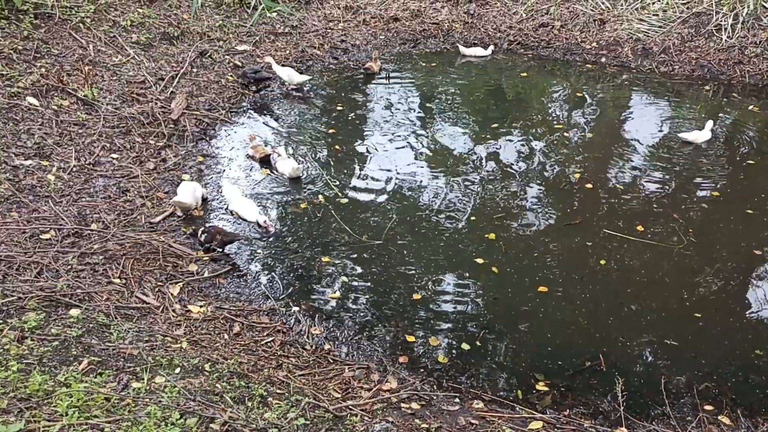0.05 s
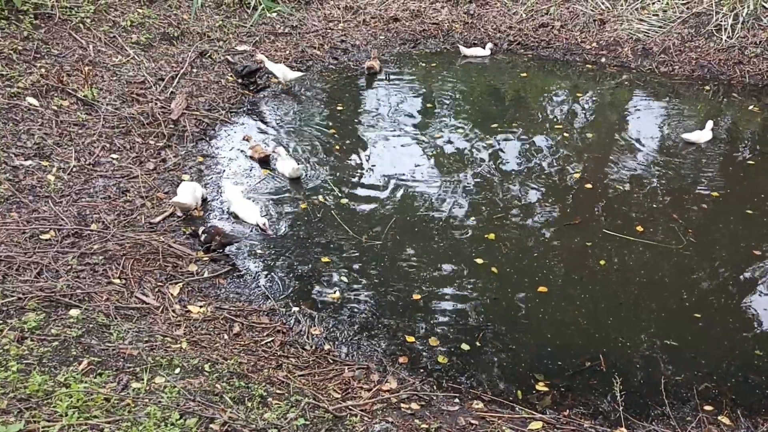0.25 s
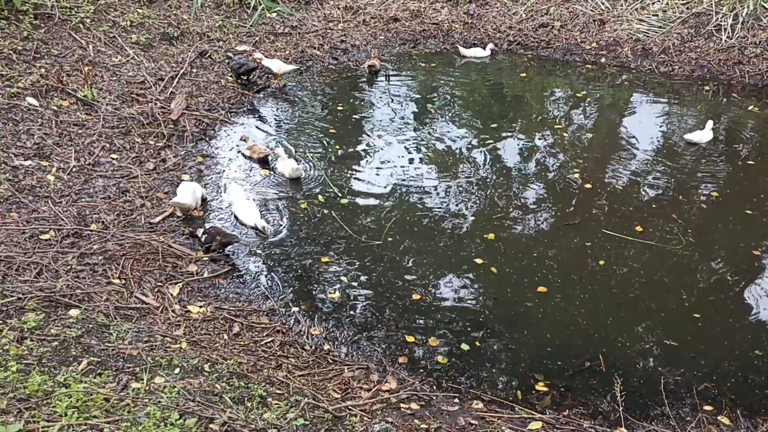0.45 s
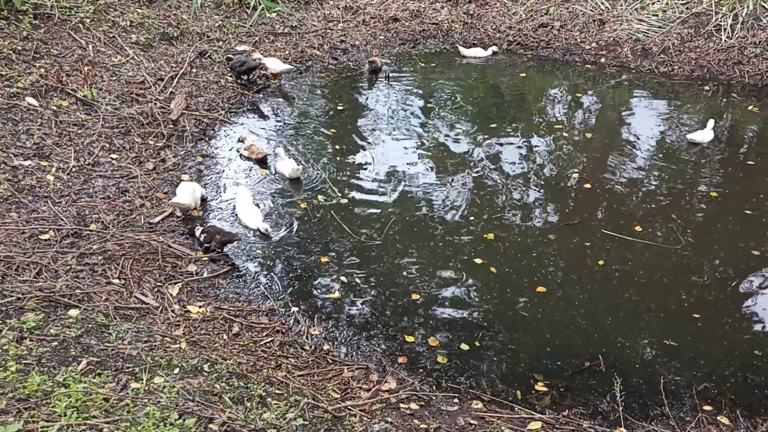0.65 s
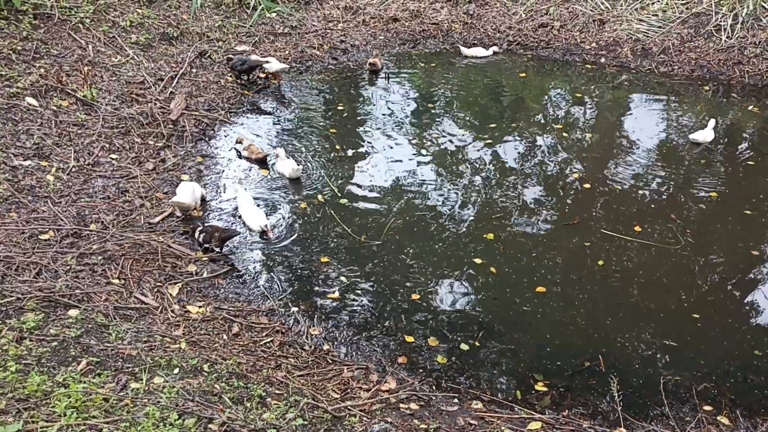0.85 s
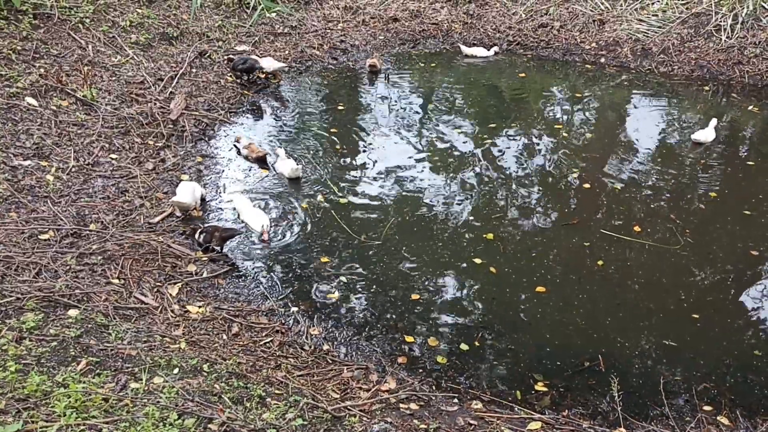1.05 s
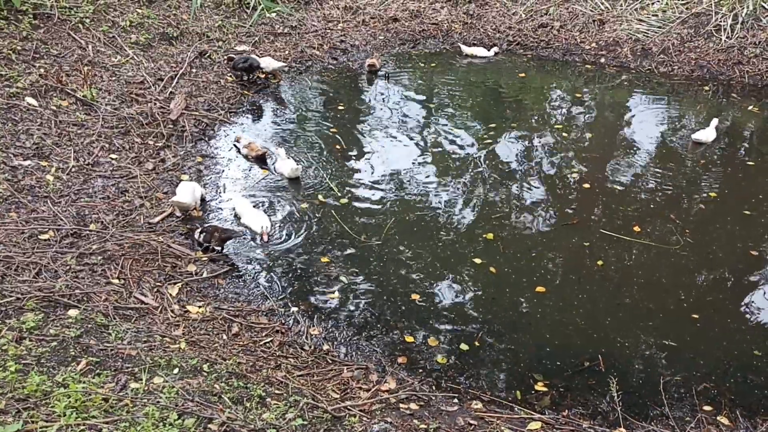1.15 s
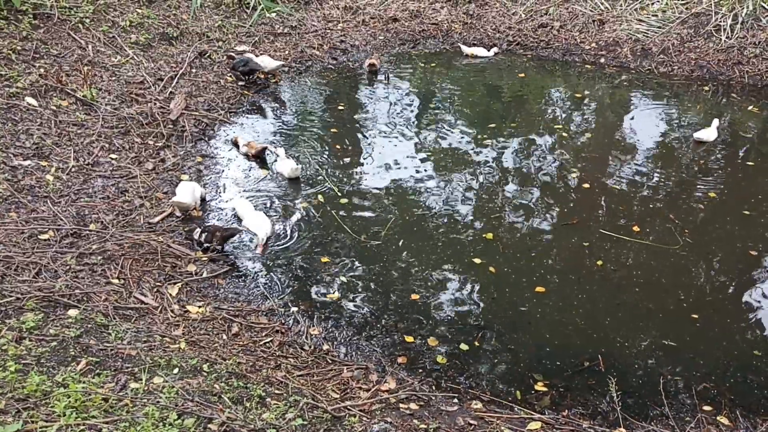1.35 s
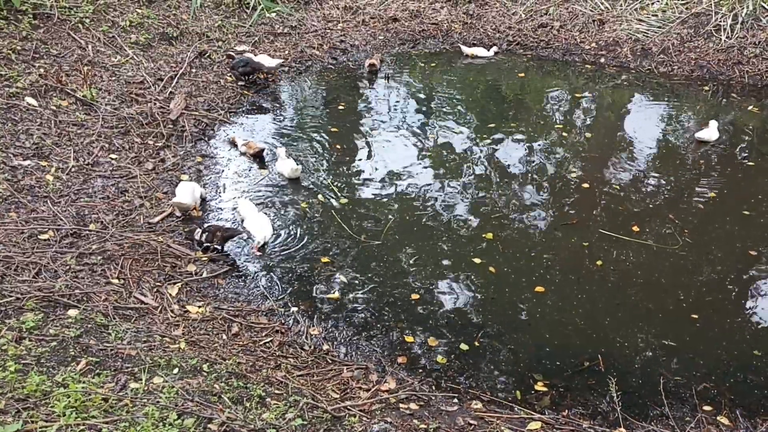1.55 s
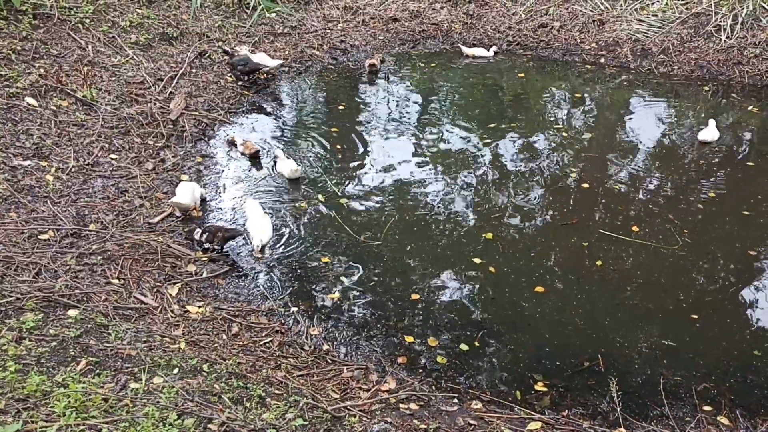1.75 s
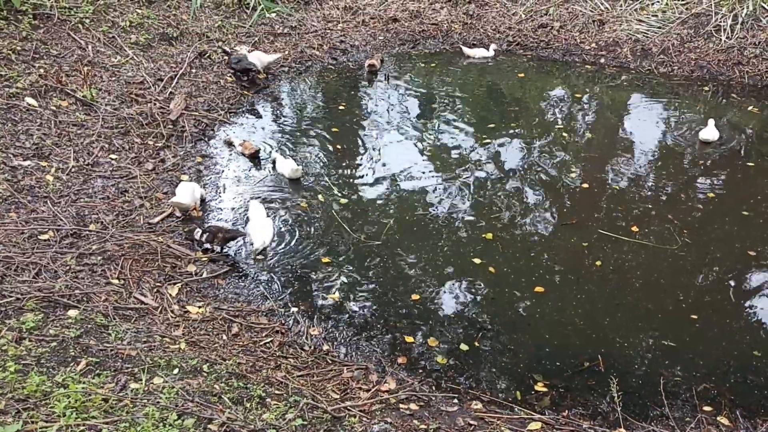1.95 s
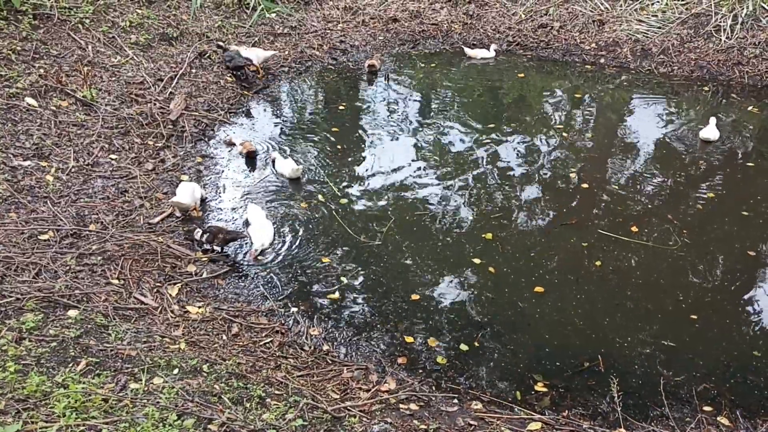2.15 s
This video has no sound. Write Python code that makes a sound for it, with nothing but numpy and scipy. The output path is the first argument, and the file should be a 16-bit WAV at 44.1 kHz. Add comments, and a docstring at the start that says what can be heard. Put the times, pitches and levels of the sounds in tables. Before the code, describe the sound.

Quiet pond edge with soft watery hiss, small drips, a wind bump and distant metal rattle

```python
"""A quiet pond edge heard through two microphone ports, 2.2 s long.
Shaped noise gives a faint hiss of water and leaves throughout, over a low hum made of one wavering sine.
Filtered ticks make tiny drops from start to end; rising sines make bubbles, all in the first 0.7 s.
Short pressure pulses, densest from 0.2 to 0.8 s, make a gust that thumps now one port, now the other.
From 1.5 s a hollow metal rattle, a sum of decaying modes, sounds far off and echoes."""
import sys
import numpy as np
from scipy import signal
from scipy.fft import rfft, irfft
from scipy.io import wavfile
from scipy.ndimage import uniform_filter1d

SR = 44100
rng = np.random.default_rng(int(sys.argv[2]) if len(sys.argv) > 2 else 0)


def wrap_up_sound(samples):
    """Save the sound to the file named by the first command line argument, as 16-bit audio."""
    columns = np.atleast_2d(samples).T
    # keep every value between -1 and 1, then stretch to whole-number steps
    tamed = np.clip(columns, -1, 1)
    steps = np.round(tamed * 32767).astype(np.int16)
    wavfile.write(sys.argv[1], SR, steps)


N = 97020  # samples

# gust thumps, levels of the main pulse: centre_s, level_db, pitch_hz, port (0 left, 1 right)
THUMPS = [(0.082, -43.2, 112, 1), (0.236, -31, 99, 1), (0.279, -38, 93, 1), (0.307, -37.5, 132, 1),
          (0.32, -39.5, 109, 0), (0.36, -27.5, 129, 1), (0.381, -46, 95, 0), (0.38, -35, 112, 1),
          (0.404, -42, 109, 0), (0.429, -29.5, 120, 1), (0.441, -39, 104, 0), (0.444, -31.5, 145, 1),
          (0.463, -29, 97, 0), (0.477, -24, 134, 0), (0.487, -30, 111, 1), (0.512, -37.5, 152, 1),
          (0.524, -20.5, 143, 0), (0.562, -30.5, 174, 0), (0.581, -43, 132, 1), (0.596, -33.5, 107, 0),
          (0.617, -24, 90.4, 0), (0.639, -36.5, 114, 0), (0.652, -39.5, 123, 0), (0.657, -35.5, 106, 1),
          (0.698, -29.5, 107, 0), (0.762, -42, 87, 0), (2.113, -40, 92, 0)]
# rumble under the thumps, before its random lumps: time_s, level_db
RUMBLE_LEVEL = [(.2, -66), (.28, -54), (.48, -50), (.7, -57), (.85, -72)]
# modes of the far metal, before each blow bends and shortens them: pitch_hz, level_db, t60_s
METAL_MODES = [(348, -5.5, 0.11), (423.5, -11, 0.14), (526, 1.5, 0.077), (767, -4, 0.096),
               (875, -2.5, 0.095), (960, 6, 0.071), (1081, 5.5, 0.063), (1660, -15, 0.056), (1875, 9, 0.05),
               (2263, -6, 0.085), (2516, -4.5, 0.098), (3210, 2, 0.061)]
# blows on the metal: start_s, level_db, centre_hz (part that rings most), spread_octaves
BLOWS = [(1.511, -47, 950, 0.35), (1.545, -52, 970, 0.27), (1.573, -51, 970, .25),
         (1.585, -45.5, 530, 0.14), (1.589, -49, 990, 0.24), (1.611, -49.5, 950, 0.25),
         (1.619, -38.5, 1010, .3), (1.625, -44.5, 2200, 0.71), (1.66, -58, 970, 0.13),
         (1.818, -51.5, 970, 0.28), (1.838, -49, 980, 0.3), (1.886, -43.5, 1030, 0.52),
         (1.905, -43.5, 970, 0.3), (1.948, -47, 940, 0.24), (2.014, -40.5, 347, 0.23),
         (2.064, -48, 380, 0.41), (2.12, -49, 950, 0.21), (2.142, -48.5, 990, 0.28)]
# loose rattle of the metal: time_s, level_db
RATTLE_LEVEL = [(1.53, -74), (1.575, -58.5), (1.64, -57), (1.78, -61.5), (1.92, -58), (2.05, -63),
                (2.2, -61)]
# drops: start_s, peak_db (mean of the ports), centre_hz, width_hz, left_minus_right_db
DROPS = [(0.03, -51, 11000, 8000, 6), (0.036, -51.5, 9100, 1960, 5), (.1845, -59, 10900, 4000, 13),
         (.255, -49.5, 12000, 7000, 12), (0.3187, -48, 5000, 3000, 2), (0.32, -49.5, 12000, 6000, 13),
         (0.4885, -55, 11600, 3030, 11), (0.7512, -56, 12200, 3000, 14.5), (.9418, -51, 11760, 2380, 18),
         (1.271, -57, 14100, 3000, 8), (1.345, -50, 14800, 2910, 12), (1.3723, -40.5, 6200, 3200, -10),
         (1.373, -52.5, 11400, 5000, 16), (1.373, -55, 10000, 4000, 14), (1.441, -53, 10100, 2000, 7),
         (1.9026, -50.5, 13400, 4000, 14), (1.9883, -53, 12200, 4000, 5), (2.178, -56.5, 12000, 2530, 25)]
# bubbles: start_s, peak_db, start_hz, rise_hz_per_ms, time_to_peak_s
BUBBLES = [(.003, -54, 1836, 73, 0.0037), (0.0255, -60.5, 1965, 110, .003), (0.049, -62, 2400, 17, 0.0033),
           (0.067, -66, 2520, 32, 0.0029), (0.107, -60.5, 1330, 53, 0.0023),
           (0.2243, -53.5, 2330, 26, 0.0025), (0.236, -70, 2170, 3.6, 0.0045),
           (0.647, -60.5, 1830, 5.5, 0.0031)]
# mean background spectrum at each port, before the microphone filters: frequency_hz, density_db_per_hz
LEFT_AIR_SPECTRUM = [(48, -102), (100, -82), (200, -89.5), (400, -90.5), (520, -96.5), (1200, -95),
                     (3400, -101), (3800, -104), (6750, -108), (7000, -113), (9200, -113), (11450, -107),
                     (11700, -99), (13000, -105), (15500, -112)]
RIGHT_AIR_SPECTRUM = [(48, -102), (100, -87.5), (200, -89.5), (400, -88), (520, -97.5), (1200, -97),
                      (3500, -98.5), (3800, -100), (4900, -102), (5800, -98.5), (6800, -96), (7050, -104),
                      (9200, -115), (11450, -118), (11700, -114), (15500, -115)]
# likeness of the background at the two ports: frequency_hz, correlation (0 to 1)
PORT_LIKENESS = [(60, 0.1), (200, 0.9), (400, 0.65), (1500, 0.42), (3000, 0.12), (8000, 0.023)]
# ducks stirring the water lift the hiss: time_s, relative_lift_db
STIR_LIFT = [(0, 4.5), (.05, 3.5), (.14, 1.5), (.21, 0), (.25, 3.5), (.3, -0.5), (.8, -1.15), (1.3, -1.6),
             (1.34, 1), (1.41, -1.1), (1.7, -2), (2.2, -1.5)]
# how far each frequency follows that lift: frequency_hz, share (1 = all of it)
STIR_SHARE = [(200, .2), (900, .95), (2500, .35), (6000, .55), (12000, 1.2)]

LEFT_LAG = 15  # samples
THUMP_CYCLES, THUMP_EDGE_DB = 0.66, -15  # half-width of the pulse; level of its sharper edge
ROLL_HZ, ROLL_S, ROLL_DB = 79, 0.017, -10.5  # low roll that each thump leaves behind
BLOW_RISE_S, BLOW_ROUGH_DB = 0.013, 2.4
LOOSE_PITCH = 0.018  # largest share by which a blow bends the modes
RATTLE_PER_S, RATTLE_RING, CLACK_DB = 700, 0.21, 0.5  # knocks; share of the mode t60; hiss over rattle
METAL_PAN_DB, LEFT_DULL_HZ = 1, 4300
ECHO_T60, ECHO_DB = 0.4, -8.5  # seconds, dB
DROP_S, DROP_TAIL_S, DROP_TAIL_DB = 0.0004, 0.0048, -14.5  # decay times of snap and fizz; fizz level
HUM_HZ, HUM_DB, HUM_WAVER_DB, HUM_WAVER_HZ = 74.95, -62.5, 2, 1  # centres and rms wavers, before the bass cut
BASS_CUT_HZ, EDGE_HZ = 62, 15800


def amp(db):
    """Decibel definition: 20 dB is a tenfold amplitude."""
    return 10 ** (np.asarray(db) / 20)


def evened(x):
    """Normalisation to unit rms."""
    return x / np.sqrt(np.mean(x ** 2) + 1e-20)


def read(points, hz):
    """Interpolation of a spectrum on a logarithmic frequency axis."""
    f, value = np.transpose(points)
    return np.interp(np.log(hz + 1), np.log(f + 1), value)


def curve(points, t):
    """Linear interpolation in time."""
    return np.interp(t, *np.transpose(points))


def band(x, lo_hz, hi_hz):
    """Band-pass filtering by a Butterworth response."""
    sos = signal.butter(2, [lo_hz, min(hi_hz, 0.45 * SR)], "band", fs=SR, output="sos")
    return signal.sosfilt(sos, x)


def slow(hz):
    """Superposition of slow sines with random phases: a drift of rms 1."""
    t = np.arange(N) / SR
    rates = np.geomspace(hz / 10, hz, 20)
    return evened(sum(np.sin(2 * np.pi * (f * t + rng.random())) / np.sqrt(f) for f in rates))


def add(mix, s, sound):
    """Linear superposition: mixes a sound in at a given second."""
    at = max(round(s * SR), 0)
    part = mix[..., at:at + sound.shape[-1]]
    part += sound[..., :part.shape[-1]]


def ports(x, pan_db):
    """Interaural-style delay and level: the sound reaches the left port a little late."""
    late = np.r_[np.zeros(LEFT_LAG), x][:len(x)]
    return np.array([late * amp(pan_db / 2), x * amp(-pan_db / 2)])


def gust():
    """Turbulent pressure: each eddy pushes one port briefly, over a rumble unrelated between the ports."""
    out = np.zeros((2, N))
    t = np.arange(-1300, 3000) / SR
    for (s, db, hz, port), start in zip(THUMPS, rng.random(len(THUMPS))):
        cycles = t * hz
        push = np.exp(-(cycles / THUMP_CYCLES) ** 2) * np.cos(2 * np.pi * (cycles + start))
        edge = np.exp(-(cycles / 0.38) ** 2) * np.cos(2 * np.pi * (2.22 * cycles + start))
        roll = np.clip(cycles, 0, 1) * np.exp(-abs(t) / ROLL_S) * np.cos(2 * np.pi * (ROLL_HZ * t + start))
        thump = push + amp(THUMP_EDGE_DB) * edge + amp(ROLL_DB) * roll
        add(out[int(port > 0.5)], s - 1300 / SR, amp(db) * thump)
    drift = 0.72 * np.array([slow(29.3), slow(31.06)])  # dB
    lumps = amp(curve(RUMBLE_LEVEL, np.arange(N) / SR) + drift)
    return out + lumps * evened(band(rng.standard_normal((2, N)), 39.0, 148))


def ring(centre_hz, octaves, ring_share, turns, bends):
    """Modal synthesis: decaying sines, favoured near the frequency of the struck part."""
    t = np.arange(8000) / SR
    out = np.zeros(len(t))
    for (hz, db, t60), turn, bend in zip(METAL_MODES, turns, bends):
        off_centre_db = 7.0 * (np.log2(hz / centre_hz) / octaves) ** 2
        decay_db = 60 * t / (t60 * ring_share)
        out += amp(db - off_centre_db - decay_db) * np.sin(2 * np.pi * (hz * bend * t + turn))
    return out * np.minimum(t / BLOW_RISE_S, 1)


def echo(x):
    """Scattered reflection: sparse decaying taps thrown back by the trees, other ones at each port."""
    t = np.arange(SR // 2) / SR
    signs = rng.choice([-1., 1.], (2, len(t)))
    sparse = rng.random((2, len(t))) < 0.05
    tail = signs * sparse * amp(-60 * t / ECHO_T60) * (t > 0.015)
    tail = tail / np.linalg.norm(tail[0])
    return amp(ECHO_DB) * signal.fftconvolve(x[None], tail, axes=1)[:, :N]


def metal():
    """Impact excitation of modes: blows and a dense loose rattle, both echoed, plus scattered hiss."""
    blows = np.zeros(N)
    chances = rng.uniform(-0.98, 1, (len(BLOWS), len(METAL_MODES)))
    for (s, db, hz, octaves), chance in zip(BLOWS, chances):
        add(blows, s, amp(db) * ring(hz, octaves, 0.93, 0.17 * chance, 1 + LOOSE_PITCH * chance))
    blows = blows * amp(BLOW_ROUGH_DB * evened(band(rng.standard_normal(N), 23, 105)))

    # four streams of random knocks, each with its own mode phases
    knocks = rng.standard_normal((4, N)) * (rng.random((4, N)) < RATTLE_PER_S / SR / 4)
    loose = np.zeros(N)
    unbent = np.ones(len(METAL_MODES))
    for row in knocks:
        response = ring(520, 1.35, RATTLE_RING, rng.random(len(METAL_MODES)), unbent)
        loose += signal.oaconvolve(row, response)[:N]
    level = amp(curve(RATTLE_LEVEL, np.arange(N) / SR))
    x = blows + level * evened(loose)

    hiss = band(band(rng.standard_normal((2, N)), 700, 3950), 770, 4330)
    clack = level * amp(CLACK_DB) * evened(hiss)
    left, right = ports(x, METAL_PAN_DB) + echo(x) + clack
    dull = signal.butter(2, LEFT_DULL_HZ, fs=SR, output="sos")
    return np.array([signal.sosfiltfilt(dull, left), right])


def drop(db, hz, width_hz, pan_db, noise):
    """Transient excitation of a band: a tick of filtered noise with a short fizz after it."""
    t = np.arange(len(noise)) / SR
    snap = np.sign(noise) * np.exp(-t / DROP_S)
    fizz = noise * amp(DROP_TAIL_DB) * np.exp(-t / DROP_TAIL_S)
    lo_hz, hi_hz = hz - width_hz / 2, hz + width_hz / 2
    x = band(band(snap + fizz, lo_hz, hi_hz), lo_hz, hi_hz)
    return ports(amp(db) * x / abs(x).max(), pan_db)


def bubbles():
    """Bubble oscillation: short sines whose pitch rises as they swell and die away."""
    t, pops = np.arange(1500) / SR, np.zeros(N)
    for s, db, hz, rise, length in BUBBLES:
        u = t / length
        turns = np.cumsum(hz + rise * 1000 * t) / SR
        add(pops, s, amp(db) * u * np.exp(1 - u) * np.sin(2 * np.pi * turns))
    return pops


def water():
    """Superposition of small drops and a few rising bubbles; only the bubbles echo."""
    out = np.zeros((2, N))
    for (s, *row), noise in zip(DROPS, rng.standard_normal((len(DROPS), 900))):
        add(out, s, drop(*row, noise))
    pops = bubbles()
    return out + pops + echo(pops)


def hum():
    """Phase integration of a wavering frequency: one low tone, slightly uneven in pitch and level."""
    turns = np.cumsum(HUM_HZ + HUM_WAVER_HZ * slow(6.5)) / SR
    level = np.sqrt(2) * amp(HUM_DB + HUM_WAVER_DB * slow(7.8))
    return ports(level * np.sin(2 * np.pi * turns), 0.48)


def air():
    """Partly coherent noise: random short-time spectra with drifting patches and a shared flicker."""
    frames, hz = N // 128 + 5, np.fft.rfftfreq(512, 1 / SR)
    a, b, c, d, patches = rng.standard_normal((frames, 257, 5)).T
    patches = evened(uniform_filter1d(uniform_filter1d(patches, 8, 0), 20, 1))
    flicker = evened(uniform_filter1d(rng.standard_normal(frames), 5))

    # the left port shares part of the right port's noise, delayed
    same = np.clip(read(PORT_LIKENESS, hz), -1, 1)[:, None]
    late = np.exp(-2j * np.pi * hz * LEFT_LAG / SR)[:, None]
    right = a + 1j * b
    left = late * same * right + np.sqrt(1 - same ** 2) * (c + 1j * d)

    stir = curve(STIR_LIFT, np.arange(frames) * 128 / SR) + 1.1 * flicker
    lift_db = read(STIR_SHARE, hz)[:, None] * stir + 1.2 * patches
    white = signal.istft(np.array([left, right]) * amp(lift_db), nperseg=512, noverlap=384)[1][:, :N]
    fine_hz = np.fft.rfftfreq(N, 1 / SR)
    colour = amp([read(LEFT_AIR_SPECTRUM, fine_hz), read(RIGHT_AIR_SPECTRUM, fine_hz)])
    return irfft(rfft(evened(white)) * colour, N) * np.sqrt(SR / 2)  # density per Hz to amplitude


def scene():
    """Linear superposition of all sources at the two ports."""
    return gust() + metal() + water() + hum() + air()


def record(dry):
    """Linear filtering: the microphone's bass cut, then the band limit."""
    high_pass = signal.butter(4, BASS_CUT_HZ, "high", fs=SR, output="sos")
    cut = signal.sosfilt(high_pass, dry)
    low_pass = signal.firwin(511, EDGE_HZ, window=("kaiser", 9), fs=SR)
    return signal.oaconvolve(cut, low_pass[None], "same")


dry = scene()
out = record(dry)
wrap_up_sound(out)
```